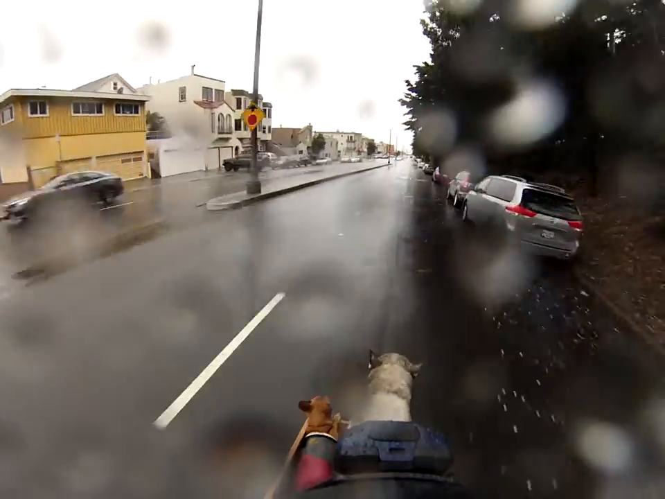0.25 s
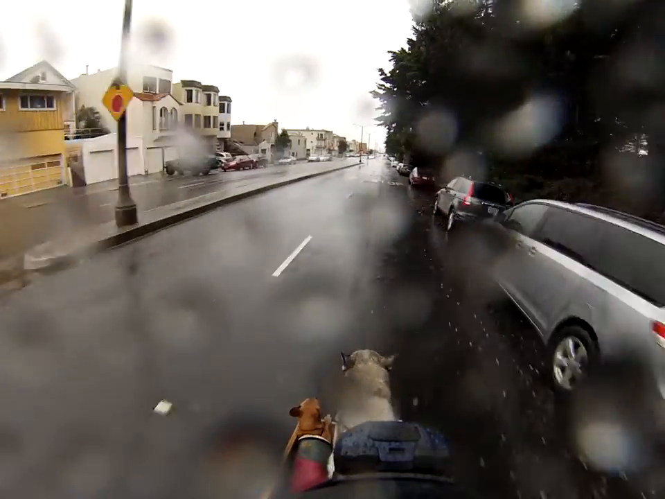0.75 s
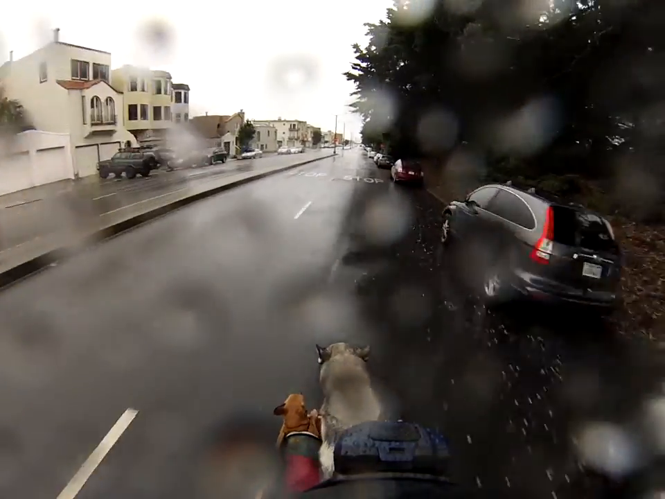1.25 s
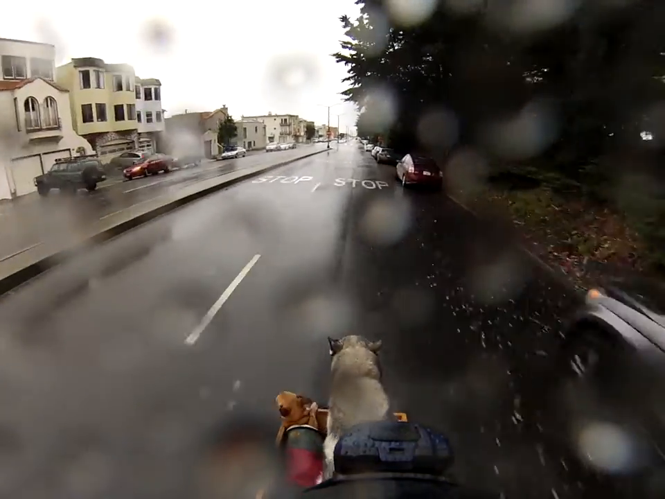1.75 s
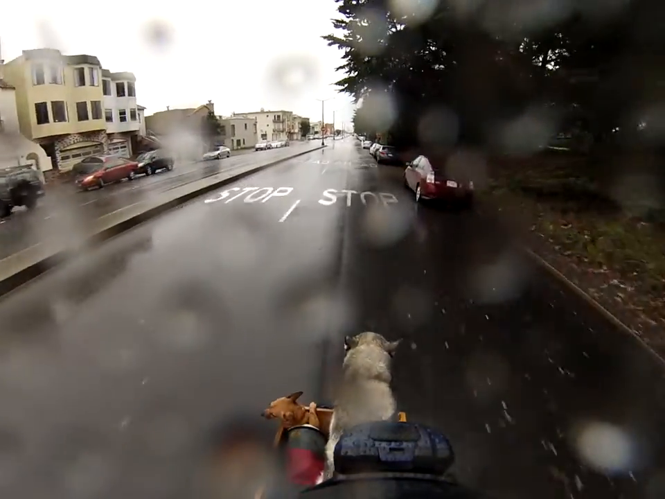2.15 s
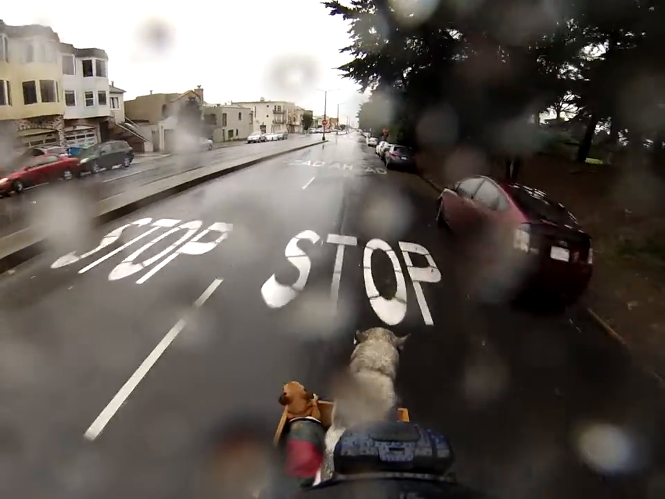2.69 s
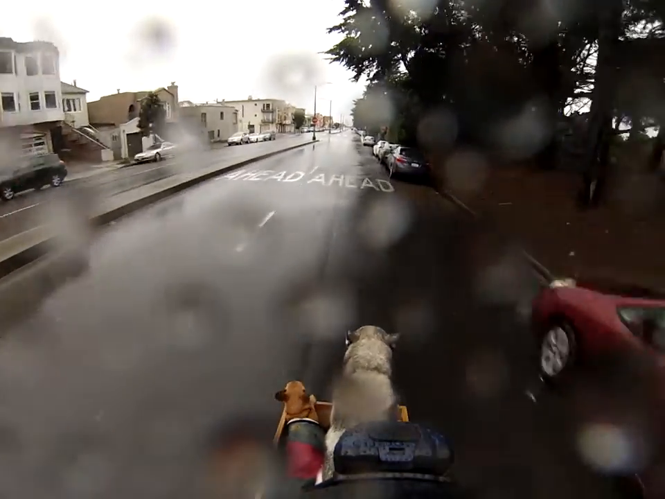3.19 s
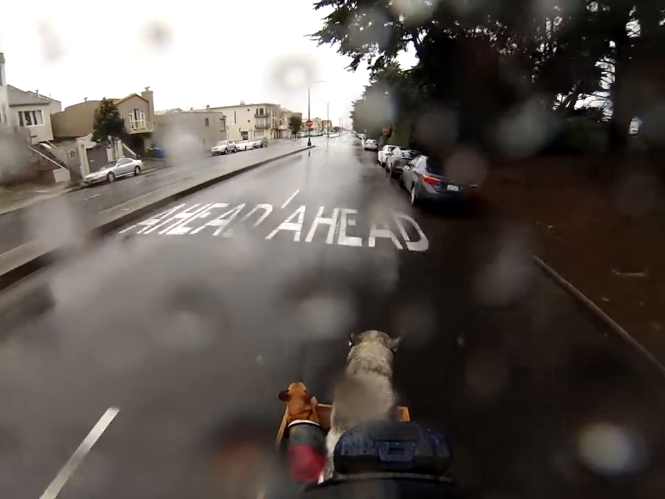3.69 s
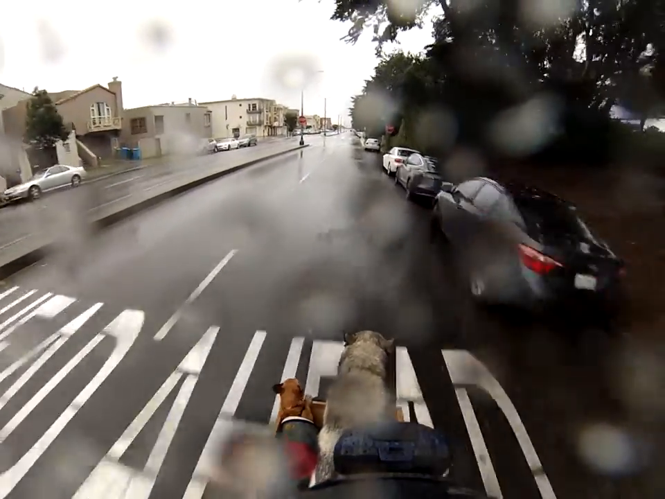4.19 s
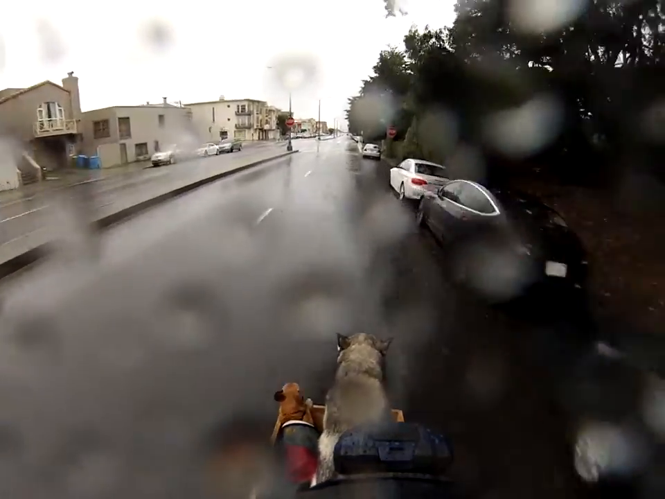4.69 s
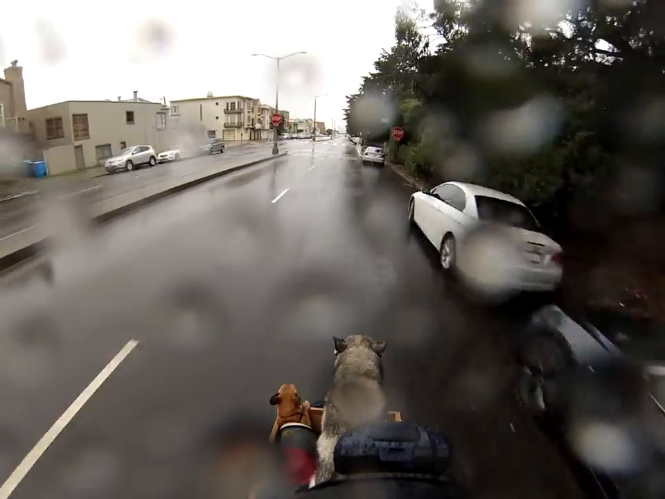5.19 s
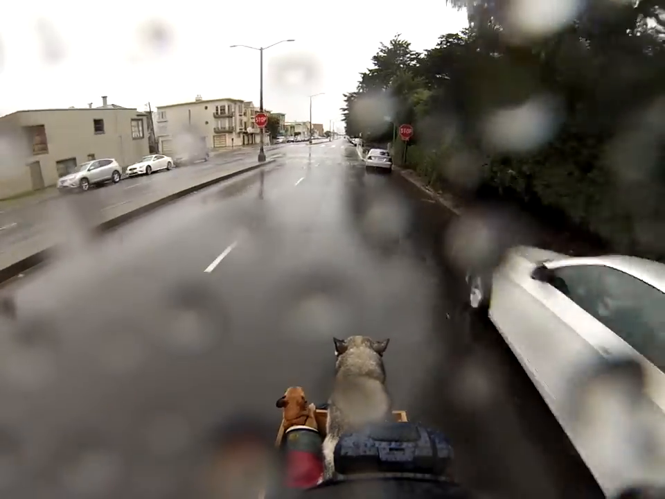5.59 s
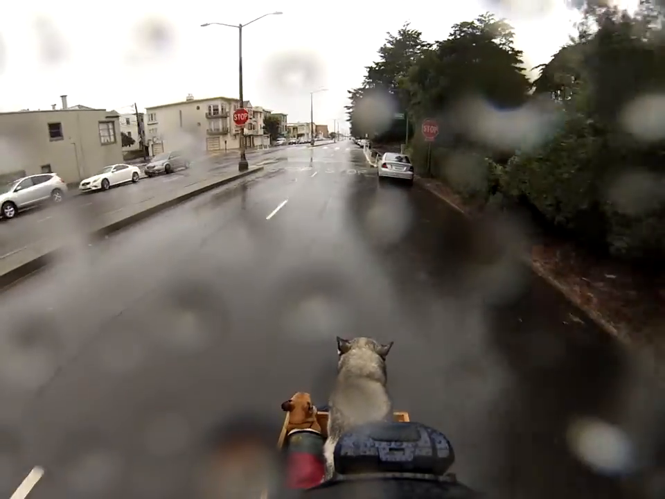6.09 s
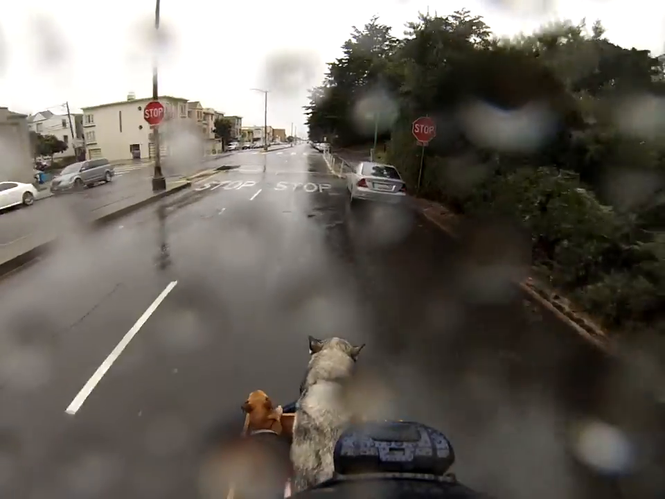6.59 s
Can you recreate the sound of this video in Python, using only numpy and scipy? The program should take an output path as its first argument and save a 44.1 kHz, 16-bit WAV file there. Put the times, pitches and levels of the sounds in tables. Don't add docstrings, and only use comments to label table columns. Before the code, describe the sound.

Inside a sealed plastic camera case on a bicycle in rain, about seven seconds. At 0 s a heavy, very low wind gust thumps the case, with more at 0.15 and 0.4 s, fading to a lull around 1.5 s. Beneath runs soft low tyre drumming; above it a steady, grainy, fluttering hiss of water from the tread, coloured boxy by the case, and a very faint high rain hush. Tiny drops crackle and fizz throughout, with clearer taps, clustered around 0.9 to 1.2 s. At 1.23 s a loud, dry, hollow knock hits the shell and dies at once. Gusts return at about 1.9, 2.4, 2.95 and 4 s. The hiss thins towards 2.9 s, stays lighter until 4 s, then thickens by 5.5 s. A weaker knock comes at 5.67 s. A sharp drop lands at 5.83 s, others near 6.4 and 6.7 s; rolling continues to the end.

```python
import sys
import numpy as np
from scipy import signal
from scipy.fft import rfft, irfft, next_fast_len
from scipy.io import wavfile
from scipy.ndimage import uniform_filter1d

SR = 44100
rng = np.random.default_rng(int(sys.argv[2]) if len(sys.argv) > 2 else 0)


def to_wav(sig):
    pcm = np.clip(np.atleast_2d(sig), -1, 1) * 32767
    pcm = np.round(pcm).astype(np.int16)
    wavfile.write(sys.argv[1], SR, pcm.T)


def undo_db(level):
    steps = np.asarray(level, float) / 20
    return 10 ** steps


N = 302073

# (frequency [Hz], bandwidth [Hz], lift [dB])
SHELL = [(1423, 270, 4.5), (3650, 120, 3.5), (6460, 190, 4.5), (855, 120, 7.5), (1810, 49, 3),
         (240, 7.9, 4.5)]


def columns(table):
    s, *rest = np.transpose(table)
    return [np.interp(np.arange(N) / SR, s, column) for column in rest]


def colour(x, points, lifts=()):
    size = next_fast_len(N)
    hz = np.maximum(np.arange(size // 2 + 1) * SR / size, 1e-3)
    at, db = np.transpose(points)
    db = np.interp(np.log(hz), np.log(at), db, left=-120, right=-120)
    for centre_hz, width_hz, lift_db in lifts:
        db = db + lift_db / (1 + (2 * (hz - centre_hz) / width_hz) ** 2)
    y = irfft(rfft(np.resize(x, size)) * undo_db(db), size)[:N]
    return y / np.std(y)


def walk(rate_hz):
    hold = int(SR / rate_hz)
    held = np.repeat(rng.standard_normal(4000), hold)[:N]
    smooth = uniform_filter1d(uniform_filter1d(held, hold), hold)
    return smooth / np.std(smooth)


def chance_times(rate_per_s):
    return rng.random(int(rate_per_s * N / SR)) * (N - 1) / SR


def level_at(curve_db, times):
    return curve_db[(times * SR).astype(int)]


def bursts(chance, lo_hz, hi_hz, decay_ms):
    age = np.arange(chance.shape[1]) / SR / (decay_ms / 1000)
    rows = chance * age * np.exp(-age)
    band = signal.butter(3, [lo_hz, min(hi_hz, 0.45 * SR)], "bandpass", fs=SR, output="sos")
    rows = signal.sosfilt(band, rows)
    return rows / np.abs(rows).max(axis=1, keepdims=True)


def place(times, rows):
    at = (np.asarray(times) * SR).astype(int)[:, None] + np.arange(rows.shape[1])
    return np.bincount(at.ravel(), rows.ravel(), N + SR)[:N]


def high_hush():
    # (frequency [Hz], spectral level [dB per Hz])
    air = [(6500, -25), (8300, 3), (10000, -2), (12000, 1), (13500, -2), (15100, -3), (15350, -30)]
    return colour(rng.standard_normal(N), air) * undo_db(-72.5)


def gusts():
    # (time [s], peak level [dB], length [s])
    swells = [(-0.004, -22.5, 0.034), (0.15, -26.5, 0.079), (0.418, -30, 0.046), (0.735, -33.5, 0.084),
              (1.08, -37.5, 0.28), (1.497, -42, 0.39), (1.928, -30, 0.047), (2.39, -28, 0.017),
              (2.586, -36.5, 0.063), (2.95, -29.5, 0.043), (3.56, -37.5, 0.11), (3.985, -31.5, 0.024),
              (4.27, -33.5, 0.067), (4.6, -39.5, 0.22), (4.97, -34.5, 0.027), (5.16, -34, 0.042),
              (5.49, -36, 0.15), (5.827, -37.5, 0.16), (6.355, -35, 0.13), (6.76, -36.5, 0.1)]
    lull_db = -43.5
    t = np.arange(N) / SR
    power = sum(undo_db(db) ** 2 * np.exp(-((t - s) / length) ** 2) for s, db, length in swells)
    return 10 * np.log10(undo_db(lull_db) ** 2 + power)


def wind(level_db):
    # (frequency [Hz], spectral level [dB per Hz])
    pressure = [(3.5, -40), (6, 0), (16, 5), (22, -3), (28, -10.5), (36, -14)]
    # (frequency [Hz], spectral level [dB per Hz])
    frame = [(18, -50), (28, -1.5), (40, 3), (56, -4), (70, -4.5), (86, -27), (110, -18), (140, -51)]
    eddies = colour(rng.standard_normal(N), pressure)
    buffet = eddies / np.sqrt(uniform_filter1d(eddies ** 2, size=SR // 7) + 0.12)
    shake_db = -47 + 0.49 * (level_db - level_db.mean())
    shake = colour(rng.standard_normal(N), frame) * undo_db(shake_db)
    return buffet * undo_db(level_db - 1.7) + shake


def tyres(level_db):
    # (frequency [Hz], spectral level [dB per Hz])
    drumming = [(41, -51), (70, 0), (86, -23), (102, -7.5), (152, -8), (226, -1.5), (316, -16), (633, -22),
                (800, -26.5), (1040, -26.5), (1760, -120)]
    return colour(rng.standard_normal(N), drumming, SHELL) * undo_db(level_db + 1.1 * walk(8.3))


def hiss(case_db, spray_db, ring_db):
    # (frequency [Hz], spectral level [dB per Hz])
    inside = [(500, -50), (640, -25), (756, -16), (852, -16.5), (1040, -8), (1150, -4.5), (1440, 1.5),
              (1920, -5), (2440, -4.5), (2840, -21.5), (3200, -17), (4160, -67)]
    # (frequency [Hz], spectral level [dB per Hz])
    bright = [(1530, 4), (2600, 5.5), (2930, -5), (3470, -3), (4170, 1.5), (4490, -14), (4790, -1.5),
              (5990, -12.5), (7840, -9.5), (8650, -36), (12500, -35), (16200, -47), (22000, -120)]
    # (frequency [Hz], spectral level [dB per Hz])
    ring_modes = [(4000, -40), (4130, -24), (4240, -3), (4370, -9), (4500, -21), (4620, -9), (4740, -5.5),
                  (4880, -12), (5050, -34)]
    flutter = walk(25)
    grain_samples = 24
    grain = undo_db(1.2 * rng.exponential(size=(2, N // grain_samples + 1)))
    grain = grain.repeat(grain_samples, axis=1)[:, :N]
    low, high = rng.standard_normal((2, N)) * grain
    body = colour(low, inside, SHELL) * undo_db(case_db + 0.62 * flutter + 0.5 * walk(40))
    ring = colour(rng.standard_normal(N), ring_modes) * undo_db(ring_db)
    spray = colour(high, bright, SHELL) * undo_db(spray_db + 0.79 * flutter + 0.57 * walk(40))
    return body + ring + spray


def sizzle(times, peak_db):
    chance = rng.standard_normal((len(times), 256))
    return place(times, undo_db(peak_db)[:, None] * bursts(chance, 9020, 13670, 0.35))


def ticks(times, splash_db, tap_db):
    chance = rng.standard_normal((len(times), 3, 384))
    splash = undo_db(splash_db - 0.6)[:, None] * bursts(chance[:, 0], 4300, 7400, 0.42)
    tap = undo_db(splash_db + tap_db + 2.5)[:, None] * bursts(chance[:, 1], 1960, 4390, 0.69)
    hollow = undo_db(splash_db + tap_db + 0.5)[:, None] * bursts(chance[:, 2], 1450, 2190, 0.41)
    return place(times, splash + tap + hollow)


def mist(spray_db):
    # (time [s], peak level [dB])
    droplets = [(0.5551, -44), (0.7632, -42), (0.852, -43), (0.953, -40), (0.963, -35), (1.2635, -41),
                (1.4292, -45), (1.5209, -44), (1.6641, -40), (2.0557, -45), (2.126, -40), (2.4229, -42),
                (2.7551, -47), (3.366, -43), (3.4496, -43), (3.5199, -43), (3.5433, -39), (3.8417, -50),
                (3.954, -47), (4.0584, -44), (4.1674, -43), (4.4313, -41), (4.603, -40), (4.7316, -42),
                (4.755, -40), (4.8065, -42), (5.3507, -47), (5.4231, -48), (5.7359, -45), (5.9768, -43)]
    when = chance_times(80)
    tone = rng.standard_normal(len(when))
    flurry_db = level_at(spray_db + 2.7 * walk(5.33), when)
    s, peak_db = np.transpose(droplets)
    return sizzle(s, peak_db - 4.0) + sizzle(when, flurry_db - 5.5 + 4 * tone)


def drizzle(spray_db):
    when = chance_times(150)
    size = np.minimum(rng.exponential(size=len(when)), 1.8)
    tone = rng.standard_normal((2, len(when)))
    small_db = level_at(spray_db, when) + 2 + 1.1 * size
    return ticks(when, small_db, -3.5 + 3 * tone[0]) + sizzle(when, small_db - 21.0 + 3 * tone[1])


def patter(spray_db):
    when = chance_times(24)
    tone = rng.standard_normal((3, len(when)))
    db = level_at(spray_db, when) + 7.5 + 2.5 * tone[0]
    return ticks(when, db, -4.5 + 4 * tone[1]) + sizzle(when, db - 7.5 + 3 * tone[2])


def drops():
    # (time [s], splash peak [dB], tap level [dB], fizz level [dB])
    clear_drops = [(0.317, -41.5, -44, -50.5), (0.8859, -37, -43, -48), (0.9264, -42, -60, -54),
                   (0.958, -40, -43.5, -52), (1.073, -45, -41.5, -46.5), (1.1683, -48, -49, -49),
                   (1.1885, -41, -50, -45), (1.349, -47, -50, -48), (1.4458, -39, -46, -48),
                   (1.564, -43, -46, -60), (1.855, -37.5, -48, -50), (1.8727, -42, -47, -56),
                   (2.1587, -40.5, -38.5, -61), (2.1635, -40, -43, -54), (2.5331, -38, -48, -48.5),
                   (3.3773, -42, -71, -52), (3.392, -40, -44, -46), (3.8582, -33.5, -43.5, -49),
                   (4.2659, -41, -42.5, -57), (4.353, -45, -41.5, -65), (4.5054, -48, -50, -50),
                   (4.613, -39.5, -50, -62), (4.9726, -41.5, -62, -52), (5.1854, -46, -43.5, -53),
                   (5.228, -43, -63, -51), (5.8297, -36.5, -46, -74), (6.3804, -40, -45, -45.5),
                   (6.3975, -37, -41.5, -51), (6.5453, -42.5, -44, -44.5), (6.7377, -38.5, -41, -46.5),
                   (0.167, -49, -46, -56), (0.4694, -49, -49, -59), (0.7388, -44, -41.5, -62),
             (0.793, -46, -59, -51), (1.0075, -47, -46, -58), (1.1233, -42, -51, -64),
             (1.4124, -45, -44.5, -60), (1.463, -46, -48, -56), (1.4773, -46, -51, -53),
             (1.9113, -44, -51, -54), (1.9426, -44, -48.5, -57), (2.0263, -42, -44, -70),
             (2.2536, -48, -48.5, -57), (2.8347, -46, -48, -54), (2.942, -45, -54, -64),
             (3.2116, -46, -52, -52.5), (3.4739, -47, -50, -56), (3.678, -51, -50, -54),
             (4.0512, -42, -53, -54), (4.2283, -44, -57, -57), (4.452, -48, -46, -63),
             (4.666, -48, -42.5, -62), (4.701, -47, -50, -56), (4.7166, -41.5, -51, -57),
             (5.6707, -45, -40, -61), (5.7239, -48, -53, -53), (5.99, -60, -52, -62),
             (6.0647, -47, -45, -56), (6.3668, -47, -58, -57), (6.5077, -51, -63, -53)]
    s, splash_db, tap_db, fizz_db = np.transpose(clear_drops)
    splash_db = splash_db + 5.5
    tap_crest_db, fizz_crest_db = 6, 9
    return ticks(s, splash_db, tap_db + tap_crest_db - splash_db) + sizzle(s, fizz_db + fizz_crest_db)


def rain(spray_db):
    return high_hush() + mist(spray_db) + drizzle(spray_db) + patter(spray_db) + drops()


def knocks():
    # (time [s], peak level [dB], frequency [Hz], swell time [ms])
    blows = [(1.2272, -12, 1900, .55), (1.2279, -30, 5100, .5), (1.2288, -18, 2350, .75),
             (1.2301, -17, 1530, 1.8), (1.2303, -20, 1770, 1.6), (1.2340, -28, 1560, 1.2),
             (1.2290, -32, 1180, 2), (1.2370, -35, 1500, 1.2), (1.2285, -38, 560, 2),
             (5.6715, -27, 2000, .5), (5.6724, -20, 1850, 1.2), (5.6735, -29, 1330, 1.4),
             (5.6722, -34, 2690, 1), (5.6725, -38, 3970, 1.5), (5.6770, -36, 1510, 2.5),
             (2.1645, -36, 1900, .8), (5.7250, -37, 1500, .7), (1.3490, -39, 3550, 1.6),
             (6.7385, -32, 2250, .6), (6.7387, -36, 3450, .7)]
    s, peak_db, hz, swell_ms = np.transpose(blows)[:, :, None]
    t = np.arange(1024) / SR
    age = t / (swell_ms / 1000)
    swell = age ** 2 * np.exp(2 * (1 - age))
    ringing = place(s[:, 0], undo_db(peak_db + 1.16) * swell * np.sin(2 * np.pi * hz * t))
    gap = signal.butter(1, (2970, 3200), "bandstop", fs=SR, output="sos")
    stiffness = signal.butter(2, 580, "highpass", fs=SR, output="sos")
    return signal.sosfiltfilt(stiffness, signal.sosfiltfilt(gap, ringing))


def scene():
    # (time [s], level [dB])
    wet = [(0.0, -54), (0.32, -55.5), (0.7, -54.5), (0.97, -53.5), (2.25, -58), (2.86, -61), (3.47, -58.5),
           (3.78, -59), (3.99, -58.5), (5.53, -55), (5.86, -57.5), (6.1, -57), (6.37, -54.5), (6.85, -57.5)]
    spray_db = columns(wet)[0]
    wetter = spray_db - spray_db.mean()
    later = (np.arange(N) - N / 2) / SR
    case_db = -49.5 + 0.71 * wetter
    ring_db = -68 + 0.9 * wetter + 2.2 * later
    drum_db = -50.5 + 0.5 * wetter + 0.5 * later
    spray = hiss(case_db, spray_db, ring_db)
    return (wind(gusts()) + tyres(drum_db) + spray + rain(spray_db) + knocks())[None]


def low_pass(x):
    return signal.sosfilt(signal.butter(12, 16490, fs=SR, output="sos"), x)


def record(dry):
    top_hz, rise_s = 15800, 0.012
    rise = 1 - 0.7 * np.exp(-np.arange(N) / SR / rise_s)
    roll_off = signal.butter(8, top_hz, fs=SR, output="sos")
    mix = signal.sosfiltfilt(roll_off, dry * rise)
    return low_pass(mix)


dry = scene()
out = record(dry)
to_wav(out)
```